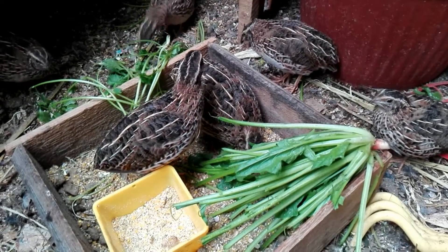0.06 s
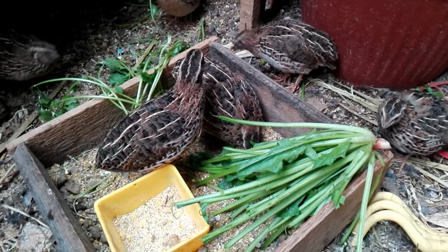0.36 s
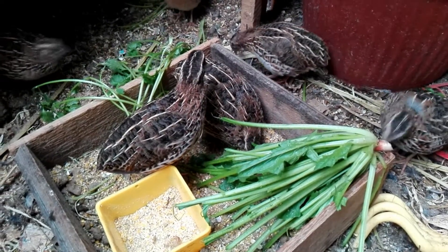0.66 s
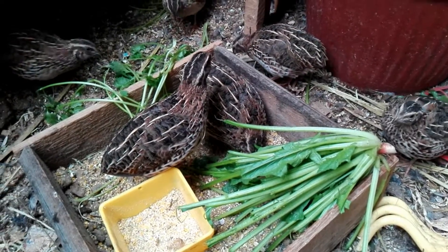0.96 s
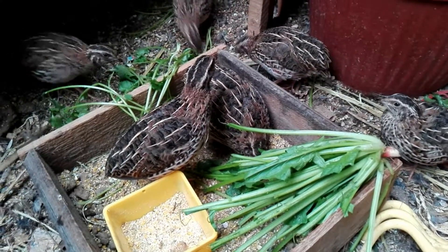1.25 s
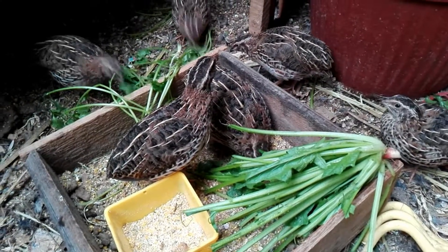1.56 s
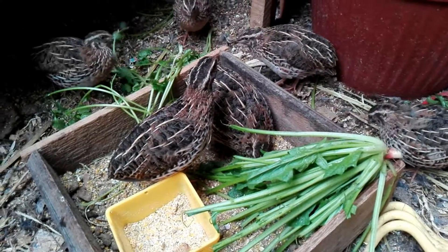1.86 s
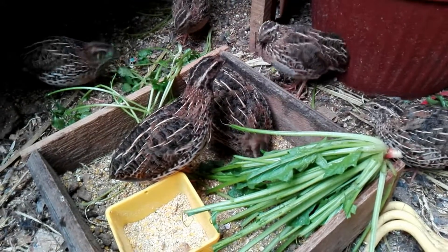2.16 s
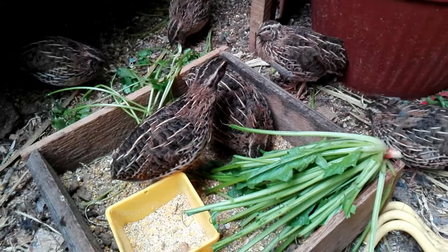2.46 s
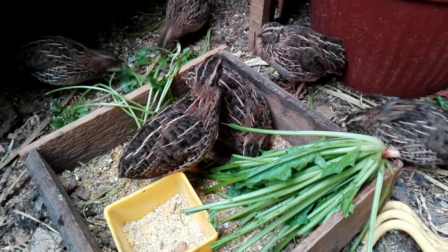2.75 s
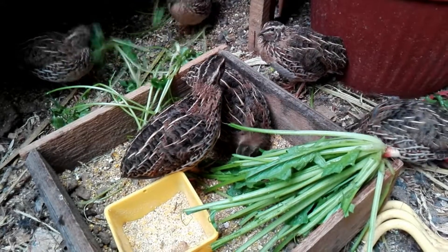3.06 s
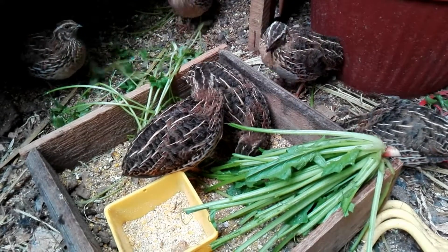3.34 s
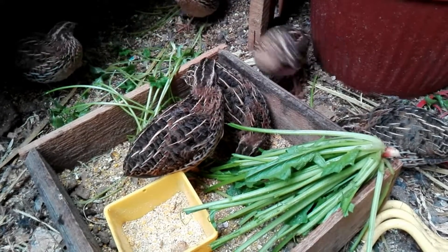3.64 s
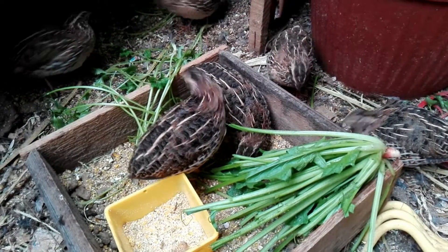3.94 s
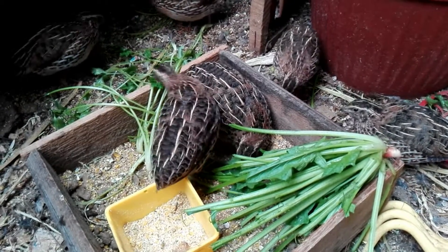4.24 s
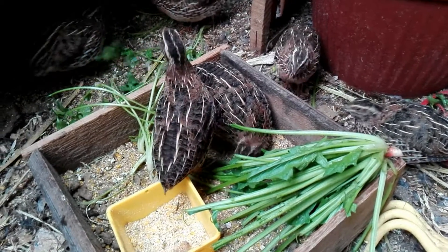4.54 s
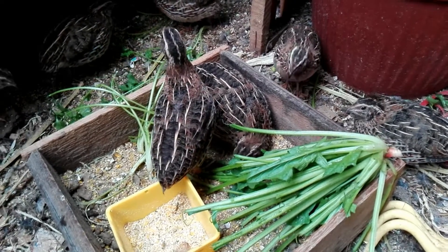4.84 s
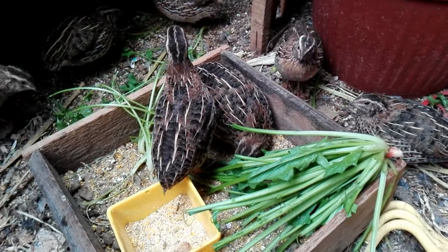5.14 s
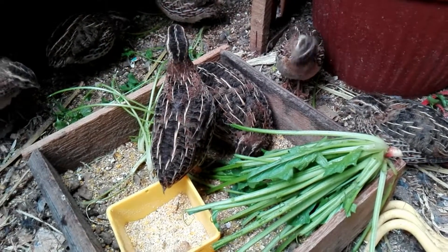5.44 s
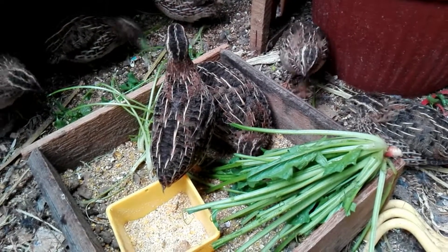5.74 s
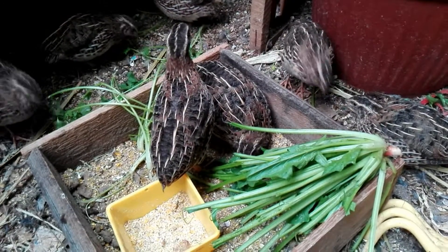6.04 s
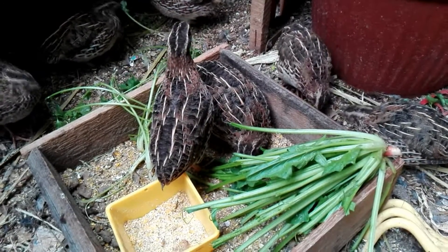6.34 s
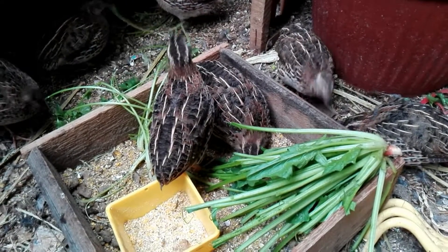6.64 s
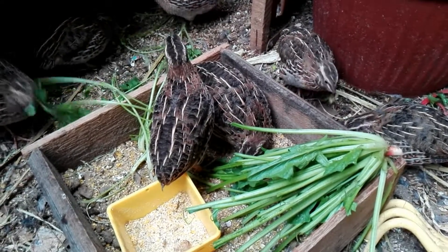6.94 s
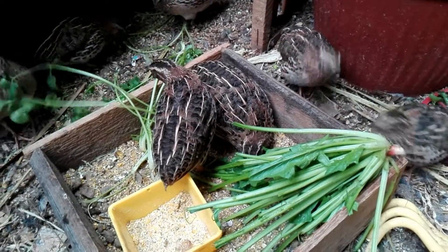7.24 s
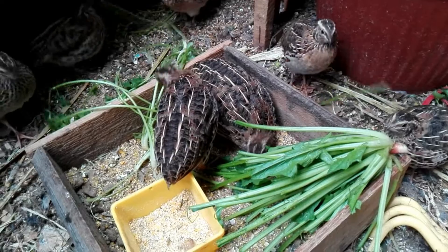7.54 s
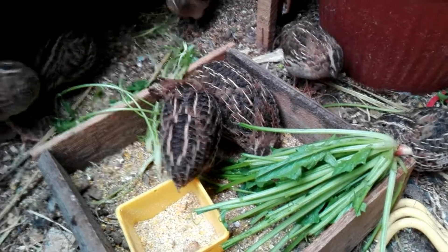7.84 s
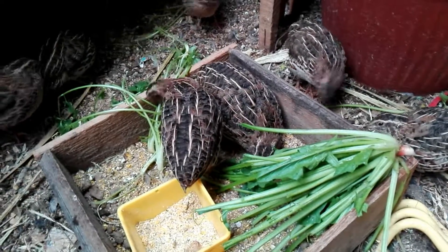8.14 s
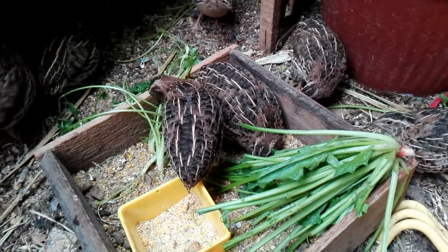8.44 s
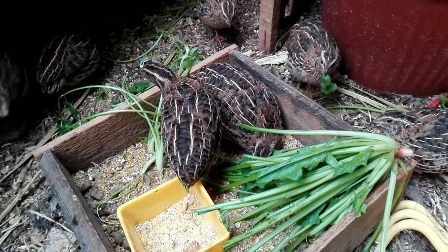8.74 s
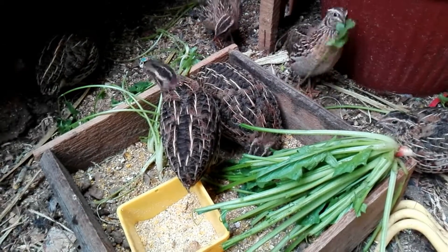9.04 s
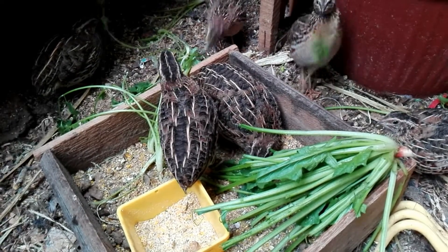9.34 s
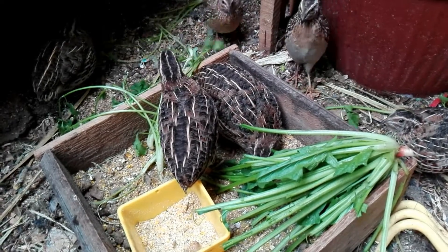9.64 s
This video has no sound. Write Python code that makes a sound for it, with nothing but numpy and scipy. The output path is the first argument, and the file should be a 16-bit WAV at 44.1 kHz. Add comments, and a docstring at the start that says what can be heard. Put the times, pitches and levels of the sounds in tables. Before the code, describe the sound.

Quail twitter and squeak in quick bursts close by, with light pecking and rustling over a low rumble of air.

```python
"""Quail feeding in a small pen

Quail twitter in quick bursts: the voice box swings evenly for a clear peep, wildly for a harsh squeak.
Beaks tap on grain and wood, and feet thud and rustle in the litter on the floor.
Small birds farther off give faint nasal calls and thin whistles. The pen adds a short ring,
and under it all lie a low rumble of air, a faint hiss and a hum that comes and goes."""
import sys
import numpy as np
from scipy import signal
from scipy.fft import rfft, irfft, next_fast_len
from scipy.io import wavfile

SR = 44100
rng = np.random.default_rng(int(sys.argv[2]) if len(sys.argv) > 2 else 0)


def wav_record(signal):
    """Record a signal, one row per channel, as 16-bit PCM in the file named by sys.argv[1]."""
    frames = np.transpose(np.atleast_2d(signal))
    bounded = np.clip(frames, -1, 1)
    # unit amplitude maps onto the largest positive 16-bit level
    quanta = np.round(bounded * 32767).astype(np.int16)
    wavfile.write(sys.argv[1], SR, quanta)


N = 436148

# Levels in the tables are relative: the functions add their own gains.
# Quail notes; a low harsh one often breaks straight into a higher, clearer one:
# start_s, length_s, first_hz, middle_hz, last_hz, level_db, swell_db, throat_hz, roughness (0 to 1)
QUAIL_NOTES = [ (0.0, 0.051, 3790, 2420, 2248, -25.5, -0.5, 3130, 0.23),
               (0.059, 0.0069, 2260, 2410, 2900, -18.5, -9, 5070, 0.45),
               (0.066, .012, 3154, 3303, 3200, -18.5, -6, 6600, 0.31),
               (0.319, 0.056, 2515, 2445, 2375, -45, 4, 4300, 0.6),
               (0.368, 0.048, 3180, 3160, 3210, -43.5, -7, 4700, 0.37),
               (0.499, 0.077, 3200, 3300, 3250, -37.5, 3.5, 4400, 0.1),
               (0.632, 0.023, 3158, 3287, 3400, -27.5, 6, 4350, 0.54),
               (0.656, 0.026, 2427, 2378, 2400, -21.5, 2, 5170, 0.65),
               (0.683, 0.048, 3380, 3357, 3145, -26, -4.5, 4330, 0.15),
               (0.814, 0.033, 2495, 2603, 2820, -19, 2.5, 6260, 0.42),
               (0.842, 0.033, 4576, 4424, 5000, -16.5, -11.5, 5600, 0.37),
               (0.921, 0.011, 3180, 4766, 5400, -16.5, 3.5, 4200, 0.8),
               (0.933, 0.024, 4890, 4650, 4850, -16, -15.5, 4400, 0.07),
               (0.978, 0.027, 4276, 4880, 5040, -24, -2, 6160, .05),
               (1.122, 0.068, 1867, 1860, 1810, -42.5, 0, 2000, 0.15),
               (1.195, 0.037, 4560, 4700, 4600, -17.5, -5, 5500, 0.35),
               (1.231, 0.026, 4690, 5690, 5200, -20.5, 0.5, 3500, 0.9),
               (1.265, .022, 4140, 4040, 4080, -26, -9, 5300, .05),
               (1.393, 0.0037, 2023, 2000, 2110, -18, 1.5, 4900, 0.3),
               (1.401, 0.038, 4730, 4320, 4080, -21, -13, 5200, 0.48),
               (1.775, 0.019, 1940, 1755, 1780, -48.5, 2, 2800, 0),
               (1.847, 0.066, 3625, 1973, 1730, -46, 3.5, 2770, 0.31),
               (2.644, 0.027, 2890, 2520, 2870, -36, -1.5, 2130, 0),
               (2.752, 0.031, 3660, 3936, 4200, -27.5, 2, 5400, 0.19),
               (2.936, 0.024, 3840, 3536, 3600, -38, -0.5, 5300, 0.23),
               (2.966, 0.044, 2060, 2390, 1976, -43, 3, 3200, 0.88),
               (3.029, 0.019, 1544, 1584, 1550, -51.5, 0.5, 2250, .15),
               (3.145, 0.029, 2283, 2158, 1957, -26, 10.5, 4200, 0.22),
               (3.178, 0.011, 2720, 2880, 2920, -25.5, 0, 5650, 0.3),
               (3.253, 0.027, 2023, 2013, 2050, -29.5, 5.5, 3800, 0.42),
               (3.286, 0.074, 2456, 2615, 2450, -29.5, -10.5, 4900, 0.77),
               (3.392, .058, 2778, 2770, 2566, -25.5, -0.5, 5050, 0.26),
               (4.227, 0.068, 1750, 1728, 1646, -67.5, -8, 4000, 0.61),
               (4.605, 0.054, 1700, 1650, 1577, -72.5, -8.5, 2100, .15),
               (5.147, 0.091, 1940, 2030, 1850, -41, -2.5, 2200, 0.31),
               (5.252, 0.012, 1970, 2050, 2010, -35.5, -4, 2800, 0.4),
               (5.261, 0.042, 1677, 1614, 1620, -44.5, -4, 2200, 0.2),
               (5.298, .022, 2710, 3180, 3250, -34.5, -5.5, 3600, 0.33),
               (5.345, 0.035, 3600, 3135, 3050, -27, 3.5, 4210, 0.04),
               (5.382, .024, 2328, 2094, 1950, -27, 3, 3350, .35),
               (5.403, 0.032, 1928, 1951, 2040, -24, -2.5, 6460, 0.37),
               (5.495, .010, 2373, 2210, 2260, -22.5, -7.5, 5120, 0.54),
               (5.815, 0.11, 1600, 1470, 1470, -60.5, 6, 5950, .08),
               (6.841, 0.064, 1990, 1800, 1970, -43.5, 1.5, 2100, .2),
               (6.906, 0.012, 3000, 3870, 5200, -28, 15.5, 4200, 0.9),
               (6.926, 0.019, 5375, 5480, 5600, -21, -10, 5500, 0),
               (6.959, 0.023, 1500, 1452, 1420, -38, -2, 5400, 0),
               (6.993, 0.04, 1427, 1337, 1400, -43.5, -2, 3400, 0),
               (7.068, 0.011, 3760, 3880, 3600, -21.5, -2, 4600, 0.25),
               (7.079, 0.04, 3193, 2140, 1885, -28, 6, 3130, 0.05),
               (7.135, 0.01, 6480, 6500, 6600, -25, -10, 6000, 0.17),
               (7.514, 0.0082, 2130, 2127, 2050, -35, -2, 3200, 0.13),
               (7.602, 0.0079, 2173, 2208, 2300, -24, -7, 5500, 0.13),
               (7.684, 0.025, 3430, 2878, 2813, -24.5, 3.5, 4570, 0),
               (8.348, 0.037, 3490, 3330, 3007, -42.5, 2.5, 4400, 0.07),
               (9.195, 0.057, 2006, 1600, 2050, -45, -3, 2400, 0.5),
               (9.258, .03, 3740, 3000, 2457, -30.5, -5, 4100, 0.23),
               (9.846, .03, 3460, 3250, 3050, -59.5, 5, 3650, .45), ]
# One long falling cry that breaks up: time_s, pitch_hz, level_db, throat_hz, roughness (0 to 1)
FALLING_CRY = [(1.016, 6064, -19, 3240, .2), (1.034, 4600, -13.5, 5230, .01), (1.053, 4600, -20.5, 6450, 0),
               (1.068, 4150, -13, 4670, .05), (1.09, 3680, -15, 5200, .3), (1.111, 3930, -16, 2140, .86),
               (1.128, 3130, -27.5, 4400, 1)]
# Tone colour of a quail's voice: frequency_hz, gain_db
VOICE_COLOUR = [(1200, 17.5), (2000, -1), (3000, 1.5), (4500, -2), (6500, 2.5), (9000, 1.5), (12000, 4),
                (14500, -10.5)]
# Beaks on grain and wood: start_s, level_db, ring_hz
BEAK_TAPS = [(0.215, -53, 4440), (0.232, -40.5, 4350), (0.296, -44, 1307), (2.45, -37, 1860),
             (2.501, -43, 1244), (4.399, -45, 3416), (6.436, -44, 3260), (6.759, -46, 2970),
             (9.456, -33.5, 995), (9.507, -40.5, 1655), (9.558, -51, 2880)]
# Feet on soil and boards: start_s, level_db, ring_hz
FOOTSTEPS = [(2.294, -51.5, 259.5), (2.4, -43, 220), (3.113, -40.5, 224), (3.234, -43, 676),
             (3.275, -42, 900), (3.309, -44, 885), (4.415, -54, 916), (6.205, -59, 231), (6.473, -51, 1190),
             (7.225, -50.5, 1175), (7.873, -49.5, 229), (8.241, -60.5, 235), (8.389, -45, 253),
             (8.767, -56, 245.6), (8.886, -54.5, 230)]
# Feet scuffling in the litter: peak_s, level_db, rise_s, fall_s
FOOT_SCUFFLES = [(0.0, -46, .1, 0.12), (0.42, -57, 0.18, 0.45), (0.8, -52.5, 0.083, 0.58),
                 (1.399, -51.5, 0.063, 0.21), (2.04, -56.5, .2, .12), (2.76, -55.5, 0.84, 0.37),
                 (3.28, -48.5, .3, 0.21), (4.43, -62.5, .1, .12), (5.65, -57.5, 0.72, 0.11),
                 (6.469, -58, 0.33, 0.13), (6.88, -53, .2, 0.22), (7.24, -56, .2, 0.11),
                 (9.2, -59.5, .15, .2), (9.48, -58.5, 0.18, 0.47)]
# Tone colour of snapping husks and leaves: frequency_hz, gain_db
LITTER_COLOUR = [(200, -19), (400, -2.5), (700, -2), (1100, 4.5), (1700, 1.5), (3500, -3), (7000, -12.5),
                 (14000, -20.5)]
# Nasal calls of far birds: middle_s, length_s, top_pitch_hz, level_db
FAR_CALLS = [(1.846, 0.094, 495, -59), (2.203, 0.089, 500, -52.5), (3.918, .13, 493, -55.5),
             (4.988, .1, 511.3, -59), (5.688, 0.097, 522, -63), (5.889, 0.24, 487, -61),
             (6.169, 0.18, 471, -63), (6.373, .083, 500, -57), (6.468, .078, 544, -56.5),
             (6.553, 0.12, 509, -59), (6.706, .093, 515, -61.5), (7.477, 0.17, 546, -56.5),
             (8.457, 0.071, 504, -52), (8.597, .15, 512.3, -53), (9.003, .096, 533, -62.5),
             (9.168, .11, 517, -49), (9.401, 0.14, 522, -53), (9.539, 0.14, 507, -56.5),
             (9.821, 0.11, 512, -63.5)]
# Tone colour of those calls: frequency_hz, gain_db
NASAL_COLOUR = [(500, -10.5), (1000, -0.5), (1500, 3.5), (2000, 11.5), (3000, 14.5), (4000, 8.5),
                (4600, 3), (5600, -0.5), (7000, -15)]
# Far whistles that rise and fall: middle_s, length_s, top_pitch_hz, level_db
FAR_WHISTLES = [(1.976, 0.072, 3500, -52), (2.205, .035, 3670, -56), (2.276, .04, 4080, -63),
                (4.166, 0.06, 3290, -70), (4.465, .04, 3980, -66)]
# Time the pen's ring takes to fade by 60 dB: frequency_hz, fade_s
PEN_RING = [(500, .4), (2500, 0.36), (5000, 0.33), (8000, 0.27), (14000, 0.34)]
# How much echoes and hiss differ between left and right: frequency_hz, gain_db
STEREO_WIDTH = [(3000, -61), (5000, -36), (6500, -16), (14000, -8)]
# Draughts of air: peak_s, rumble_db, buffet_db, rise_s, fall_s
DRAUGHTS = [(0.05, -44, -61.5, .3, 1.3), (0.97, -42.5, -60, 0.22, 6), (2.42, -39, -47.5, 0.31, 2.2),
            (3.02, -39, -45, 1.1, .35), (3.6, -45, -60.5, 1.5, 1.5), (4.1, -42.5, -69, 0.77, .5),
            (4.72, -47, -72, 1.0, 0.55), (6.52, -45.5, -55, 0.28, 0.55), (7.45, -55.5, -61.5, 0.87, 1.0),
            (8.27, -50.5, -62.5, 1.12, .8), (9.02, -44.5, -72, .15, 0.69), (9.85, -46, -74, 0.26, .5)]
# Tone colours of the air's deep rumble, its buffeting and its hiss: frequency_hz, gain_db
RUMBLE_COLOUR = [(20, -5), (35, 5.5), (55, -0.5), (70, -1.5), (100, -8.5), (140, -22), (300, -57.5),
                 (1500, -100)]
BUFFET_COLOUR = [(70, -19.5), (120, -3), (200, -2.5), (270, -14), (400, -24.5), (800, -41), (4000, -89.5)]
HISS_COLOUR = [(100, 16), (400, -2.5), (1000, -0.5), (2500, -7.5), (5000, -9.5), (10000, -6.5),
               (14000, -10.5)]
# Low hums that swell and fade: middle_s, length_s, pitch_hz, level_db
LOW_HUMS = [(1.1, .8, 84, -46.5), (2.7, 1.4, 56, -37.5), (3.9, 2.6, 42, -47), (2.7, 0.93, 205, -55)]

HISS_DB = -67


def quail(lead_s=.0005):
    """The flock's voices: one long cry and many short notes."""
    out = np.zeros(N)
    for curve in [FALLING_CRY] + [note_curve(*note) for note in QUAIL_NOTES]:
        add(out, curve[0][0] - lead_s, peep(curve))
    return out


def note_curve(start_s, length_s, first_hz, middle_hz, last_hz, level_db, swell_db, throat_hz, rough):
    """A note bends in pitch, arches in loudness and settles from a rough start. Rows as in FALLING_CRY."""
    arch_db, throat_follows, settling = 1, .1, .4
    u = np.linspace(-1, 1, 15)  # -1 is the start of the note, 1 its end
    glide = (last_hz / first_hz) ** (u / 2)
    bend = (np.sqrt(first_hz * last_hz) / middle_hz) ** (u * u)
    pitch = middle_hz * glide * bend
    loudness_db = level_db + swell_db * u / 2 + arch_db * (.5 - u * u)
    throat = throat_hz * (pitch / middle_hz) ** throat_follows
    times = start_s + length_s * (u + 1) / 2
    return np.transpose([times, pitch, loudness_db, throat, rough * (1 - settling * u)])


def peep(curve, sharpness=5.0, attack_s=.008, release_s=.007, highest_hz=15000):
    """The voice box swings evenly for a peep, wildly for a squeak; the throat picks out a harmonic."""
    start_s, end_s, size = curve[0][0], curve[-1][0], SR // 7
    t = start_s - attack_s / 2 + np.arange(size) / SR
    pitch, level_db, throat_hz, rough = along(curve, t)
    rough = .1 + .9 * np.clip(rough, 0, 1)  # even the clearest note has a little rasp
    # the pitch trembles, and tears as the strain grows
    tremble = .013 * wobble(220, size)
    tear = .075 * rough * wobble(1100, size)
    phase = 2 * np.pi * np.cumsum(pitch * (1 + tremble + tear)) / SR
    harmonic = np.arange(1, 10)[:, None]  # harmonics are whole multiples of the pitch
    hz = harmonic * pitch
    dullness = .75 + .013 * (-24.5 - level_db)  # softer notes have weaker high harmonics
    off_throat = sharpness * (hz / throat_hz - throat_hz / hz)
    weight = (hz < highest_hz) / np.sqrt(harmonic ** dullness * (1 + off_throat ** 2))
    weight = weight / np.sqrt(np.sum(weight ** 2, axis=0) / 2) * from_db(at_hz(VOICE_COLOUR, hz))
    # wild swinging smears each harmonic into a band of noise
    chaos = (wobble(750, hz.size) + 1j * wobble(750, hz.size)).reshape(hz.shape) * .86 * rough
    waves = np.imag((1 + chaos) * np.exp(1j * harmonic * phase))
    tone = np.sum(weight * waves, axis=0) / np.sqrt(1 + rough ** 2)
    tone /= np.maximum(1, np.abs(signal.hilbert(tone)) / 2.6)  # the voice box can only swing so far
    sputter_db = (1.2 + 1.5 * rough) * np.clip(wobble(260, size), -3, 1.3)
    fade = np.clip((t - t[0]) / attack_s, 0, 1) * np.clip((end_s + release_s - t) / release_s, 0, 1)
    note = from_db(level_db + sputter_db) * np.sin(fade * np.pi / 2) ** 2 * tone
    # the tiny beak lets out almost nothing below the lowest pitch
    low_cut = signal.butter(8, min(.84 * pitch.min(), 2700), "high", fs=SR, output="sos")
    return signal.sosfilt(low_cut, note)


def pecks_and_steps():
    """Sharp pecks, dull steps and the faint feeding of the other quail."""
    beaks = knocks(BEAK_TAPS, fade_s=.015, width=.64, crack_db=-3, gain_db=-4.5)
    feet = knocks(FOOTSTEPS, fade_s=.079, width=.058, crack_db=-16, gain_db=1.5)
    others = knocks(foraging(), fade_s=.054, width=.3, crack_db=-7.5, gain_db=-5)
    return beaks + feet + others


def knocks(rows, fade_s, width, crack_db, gain_db):
    """A beak or foot strikes: a knock with a crack of grain on top, dying by 60 dB in fade_s."""
    out, t = np.zeros(N), np.arange(SR // 6) / SR
    for start_s, level_db, ring_hz in rows:
        edges_hz = [ring_hz / (1 + width), ring_hz * (1 + width)]
        knock = unit_power(noise_band(edges_hz, len(t)))
        crack = from_db(crack_db) * coloured(rng.standard_normal(len(t)), LITTER_COLOUR)
        add(out, start_s, from_db(level_db + gain_db - 60 * t / fade_s) * (knock + crack))
    return out


def foraging(count=90, level_db=-57, spread_db=3.5, low_hz=200, high_hz=5000):
    """Random taps and footfalls from the rest of the flock: start_s, level_db, ring_hz."""
    return [(when * N / SR, level_db + spread_db * (2 * force - 1), low_hz * (high_hz / low_hz) ** hard)
            for when, force, hard in rng.random((count, 3))]


def rustle(snaps_per_s=1600, spread_db=2.6, clump_db=3.0):
    """Husks and leaves shift underfoot in clumps of tiny snaps, and stir faintly between scuffles."""
    snaps = (rng.random(N) < snaps_per_s / SR) * rng.choice([-1, 1], N)
    strength = from_db(spread_db * np.minimum(rng.exponential(1, N), 4))
    clumps = from_db(clump_db * wobble(30, N))
    level_db = surges(FOOT_SCUFFLES, rest_db=-77.5)
    return from_db(level_db) * coloured(snaps * strength * clumps, LITTER_COLOUR)


def far_birds(flicker_db=7.0):
    """Small birds give hoarse nasal calls of many harmonics, and thin whistles of just one."""
    out = np.zeros(N)
    for middle_s, length_s, top_hz, level_db in FAR_CALLS:
        phase, swell = arched_call(length_s, top_hz, sag=rng.uniform(.03, .09), jitter=.012)
        tone = 0
        for harmonic in range(1, 14):
            flicker = flicker_db * wobble(45, SR // 2)[:len(phase)]
            gain = from_db(at_hz(NASAL_COLOUR, harmonic * top_hz) + flicker)
            tone += gain * np.sin(harmonic * phase + rng.uniform(0, 2 * np.pi))
        add(out, middle_s - length_s / 2, from_db(level_db) * swell * unit_power(tone))
    for middle_s, length_s, top_hz, level_db in FAR_WHISTLES:
        phase, swell = arched_call(length_s, top_hz, sag=.3, jitter=.01)
        add(out, middle_s - length_s / 2, from_db(level_db) * swell * np.sin(phase))
    return out


def arched_call(length_s, top_hz, sag, jitter):
    """Phase and loudness of a call that rises and falls; sag and jitter are shares of the top pitch."""
    u = np.linspace(-1, 1, int(length_s * SR))
    pitch = top_hz * (1 - sag * u ** 2 + jitter * wobble(180, SR // 2)[:len(u)])
    return 2 * np.pi * np.cumsum(pitch) / SR, np.cos(u * np.pi / 2)


def pen(sound, tail_db=-12, echo_db=-4.5, echoes_per_s=900, echo_fade_s=.11):
    """Nearby boards throw back strong, quick echoes; a soft wash of sound follows and dies away."""
    t = np.arange(SR // 2) / SR
    echoes = rng.standard_normal(len(t)) * (rng.random(len(t)) < echoes_per_s / SR)
    echoes *= from_db(-60 * t / echo_fade_s) * (t > .003)
    echoes *= from_db(echo_db) / np.linalg.norm(echoes)
    tail, edges_hz = 0, np.geomspace(200, 16000, 9)
    for low, high in zip(edges_hz, edges_hz[1:]):
        fade_s = at_hz(PEN_RING, np.sqrt(low * high))
        tail += noise_band([low, high], len(t)) * from_db(-60 * t / fade_s) * (t > .006)
    tail *= from_db(tail_db) / np.linalg.norm(tail)
    return sound + signal.fftconvolve(sound, echoes + tail)[:N]


def air(rumble_gain_db=-2, buffet_gain_db=-3.5):
    """Draughts rumble and buffet unevenly at the microphone, over a faint, steady hiss."""
    rumble_db = surges([(s, db, rise, fall) for s, db, _, rise, fall in DRAUGHTS], rest_db=-55)
    buffet_db = surges([(s, db, rise, fall) for s, _, db, rise, fall in DRAUGHTS], rest_db=-68.5)
    lumps_db = 2.8 * wobble(9, N)
    layers = [(rumble_db + rumble_gain_db + lumps_db, RUMBLE_COLOUR),
              (buffet_db + buffet_gain_db + lumps_db, BUFFET_COLOUR),
              (HISS_DB, HISS_COLOUR)]
    return sum(from_db(db) * coloured(rng.standard_normal(N), colour) for db, colour in layers)


def hums():
    """Low hums come and go, each nearly steady in pitch."""
    out = np.zeros(N)
    for middle_s, length_s, pitch_hz, level_db in LOW_HUMS:
        size = int(length_s * SR)
        pitch = pitch_hz * (1 + .025 * wobble(12, 3 * SR)[:size])
        tone = np.sin(2 * np.pi * np.cumsum(pitch) / SR)
        swell = np.sin(np.linspace(0, np.pi, size))
        add(out, middle_s - length_s / 2, from_db(level_db) * swell * tone)
    return out


def surges(rows, rest_db, drop_db=20):
    """A level in dB that swells above rest_db, moving by drop_db in each rise or fall time."""
    t = np.arange(N) / SR
    level_db = np.full(N, float(rest_db))
    for peak_s, peak_db, rise_s, fall_s in rows:
        from_peak = np.maximum((peak_s - t) / rise_s, (t - peak_s) / fall_s)
        level_db = np.maximum(level_db, peak_db - drop_db * from_peak)
    return level_db


def from_db(db):
    """Turn decibels into a number to multiply by."""
    return 10 ** (np.asarray(db) / 20)


def unit_power(x):
    """Scale a signal so that its average power is 1."""
    return x / np.sqrt(np.mean(x ** 2) + 1e-20)


def at_hz(points, hz):
    """Look up a frequency in a table, blending between rows on a scale of octaves."""
    frequencies, values = np.transpose(points)
    return np.interp(np.log(np.maximum(hz, 1)), np.log(frequencies), values)


def along(curve, t):
    """Look up every column of a curve at the times t."""
    times, *columns = np.transpose(curve)
    return [np.interp(t, np.sort(times), column) for column in columns]


def coloured(x, colour):
    """Give a signal a tone colour, at a power of 1."""
    size = next_fast_len(len(x))
    gain = from_db(at_hz(colour, np.fft.rfftfreq(size, 1 / SR)))
    return unit_power(irfft(rfft(x, size) * gain, size)[:len(x)])


def noise_band(edges_hz, size):
    """Noise between a low and a high frequency."""
    band = signal.butter(2, edges_hz, "band", fs=SR, output="sos")
    return signal.sosfilt(band, rng.standard_normal(size))


def wobble(rate_hz, size):
    """Random wandering up to about rate_hz, with a typical size of 1."""
    smooth, run_in = signal.butter(2, rate_hz, fs=SR, output="sos"), SR // 10
    return unit_power(signal.sosfilt(smooth, rng.standard_normal(size + run_in))[run_in:])


def add(out, start_s, sound):
    """Mix a sound in at a given time."""
    start = max(0, int(start_s * SR))
    out[start:start + len(sound)] += sound[:max(0, N - start)]


def scene(quail_db=-1, far_db=-1, side_hiss_db=-6):
    """Everything sits in the middle; only the treble of echoes and hiss differs from left to right."""
    near = from_db(quail_db) * quail() + pecks_and_steps() + rustle()
    middle = pen(near) + from_db(far_db) * pen(far_birds(), tail_db=-7) + air() + hums()
    echoes = pen(near) - near
    hiss = from_db(HISS_DB + side_hiss_db) * coloured(rng.standard_normal(N), HISS_COLOUR)
    size = next_fast_len(N)
    width = from_db(at_hz(STEREO_WIDTH, np.fft.rfftfreq(size, 1 / SR)))
    side = irfft(1j * rfft(echoes + hiss, size) * width, size)[:N]  # 1j shifts waves a quarter cycle
    return np.array([middle + side, middle - side])


def record(dry, cutoff_hz=14400):
    """Cut the very highest treble steeply."""
    return signal.sosfilt(signal.ellip(10, .3, 80, cutoff_hz, fs=SR, output="sos"), dry)


dry = scene()
out = record(dry)
wav_record(out)
```